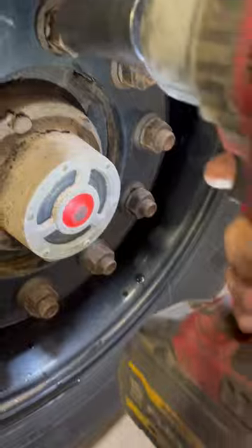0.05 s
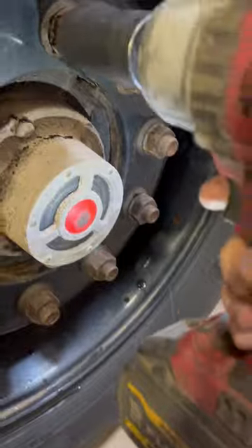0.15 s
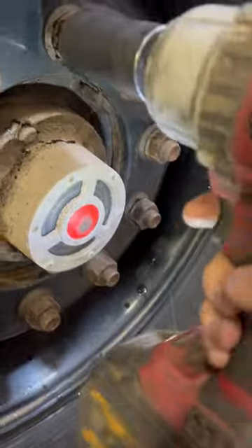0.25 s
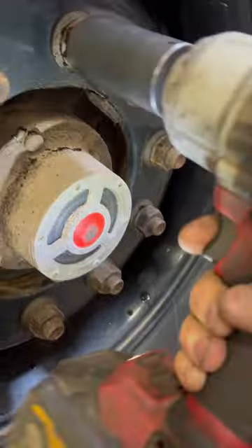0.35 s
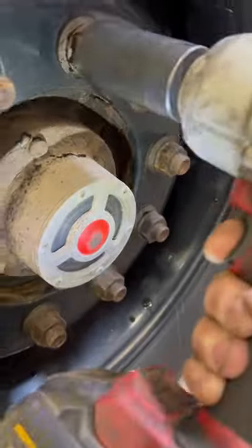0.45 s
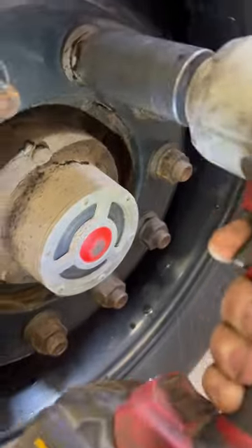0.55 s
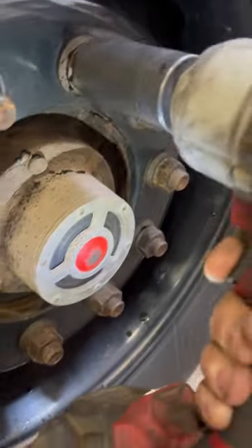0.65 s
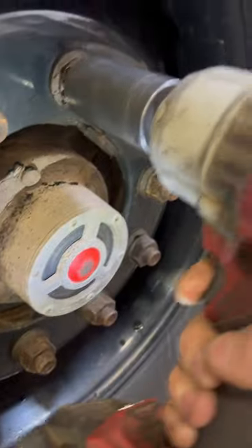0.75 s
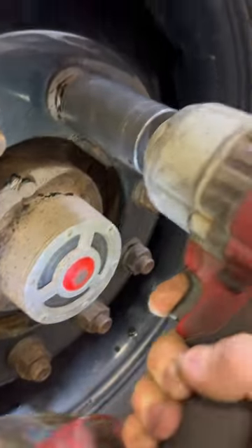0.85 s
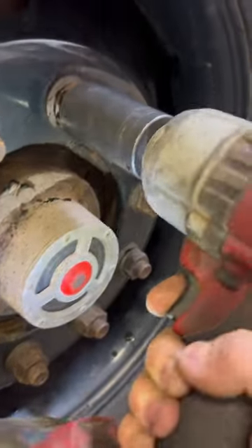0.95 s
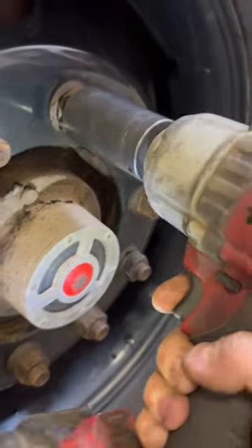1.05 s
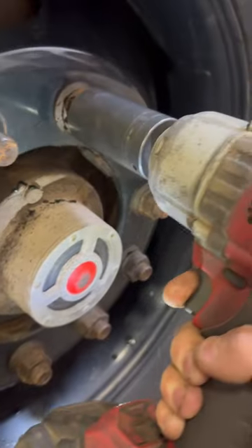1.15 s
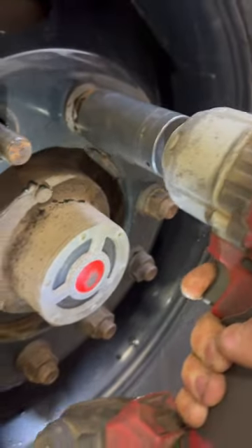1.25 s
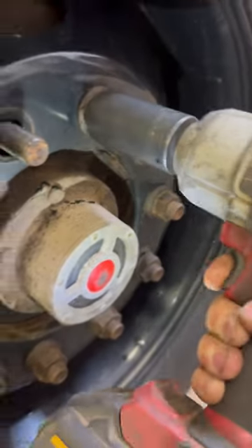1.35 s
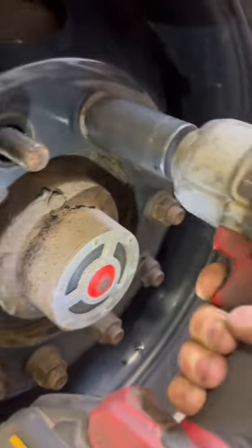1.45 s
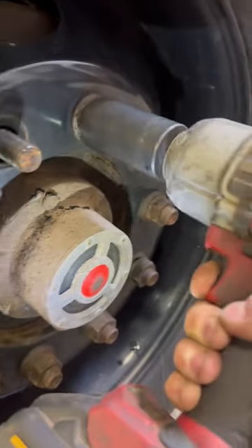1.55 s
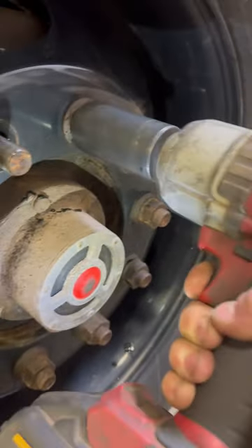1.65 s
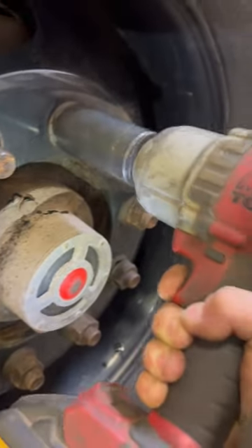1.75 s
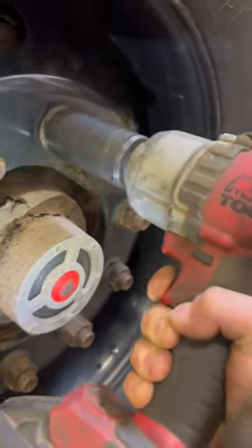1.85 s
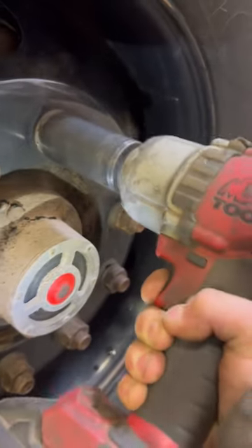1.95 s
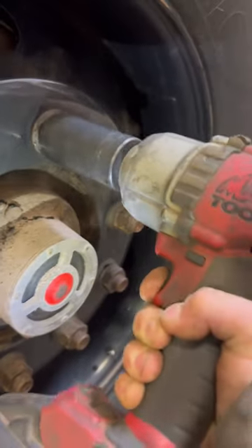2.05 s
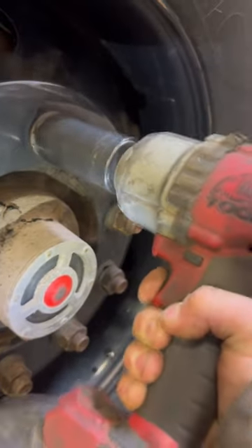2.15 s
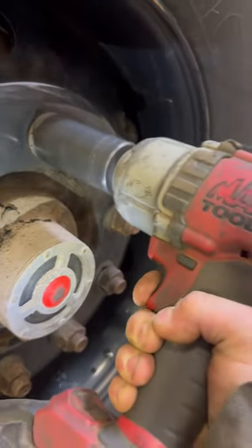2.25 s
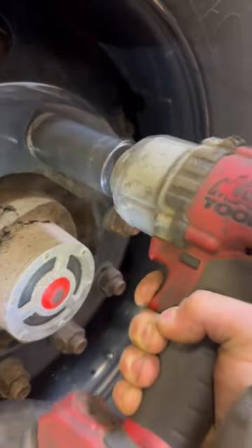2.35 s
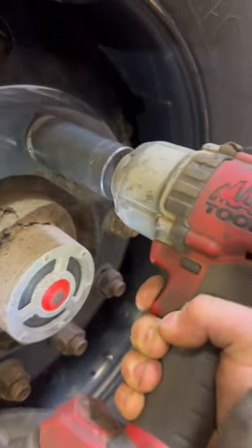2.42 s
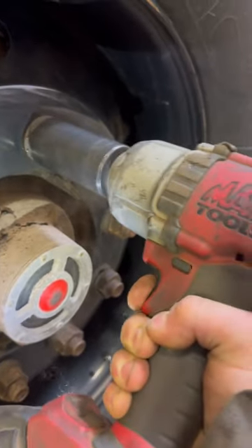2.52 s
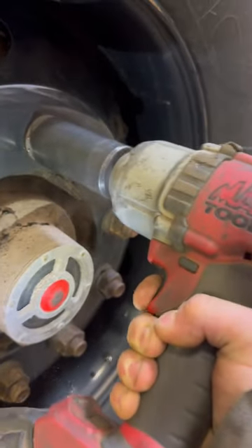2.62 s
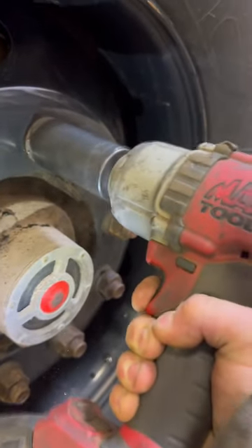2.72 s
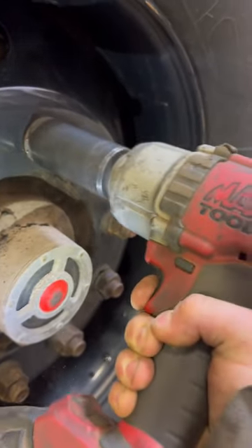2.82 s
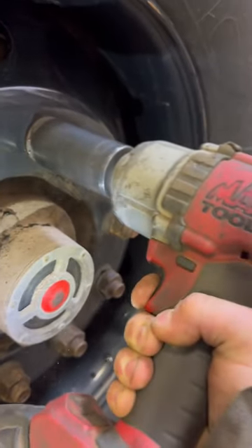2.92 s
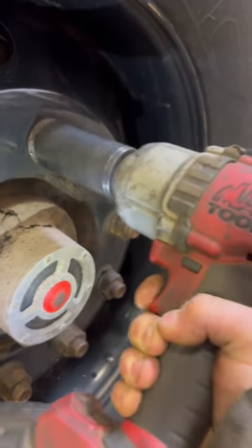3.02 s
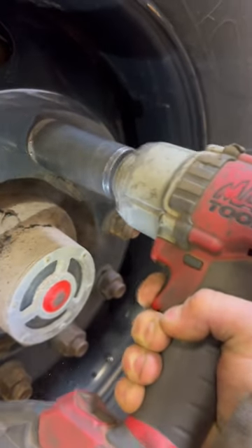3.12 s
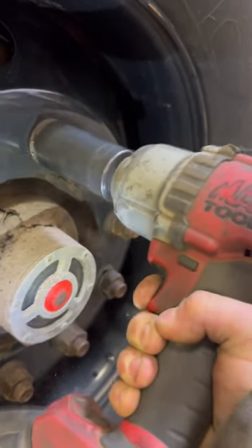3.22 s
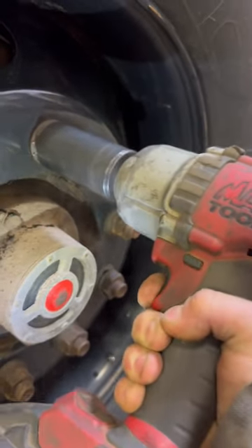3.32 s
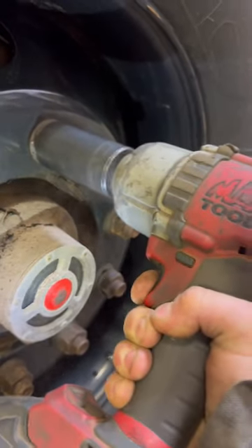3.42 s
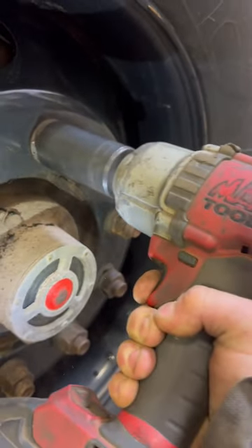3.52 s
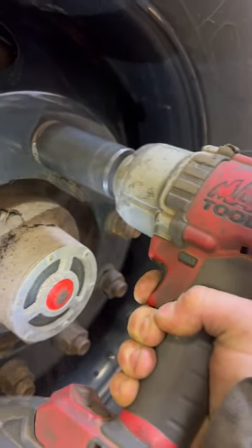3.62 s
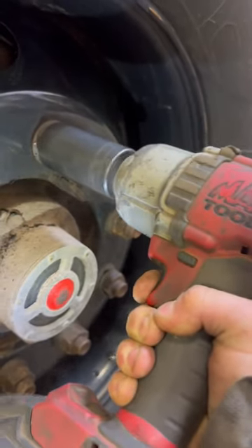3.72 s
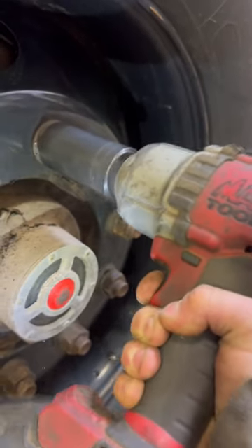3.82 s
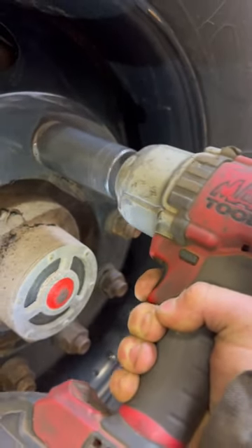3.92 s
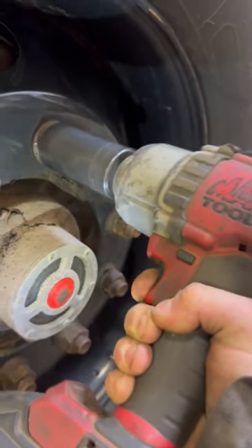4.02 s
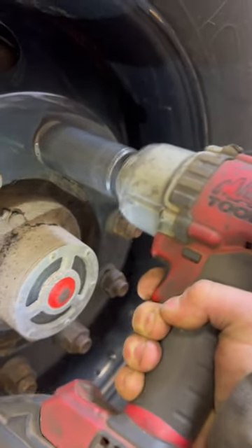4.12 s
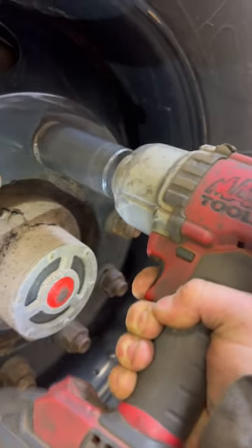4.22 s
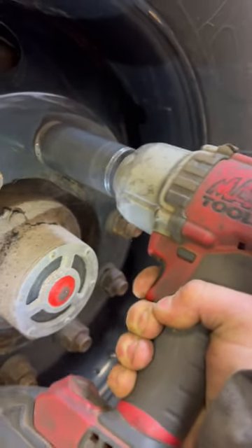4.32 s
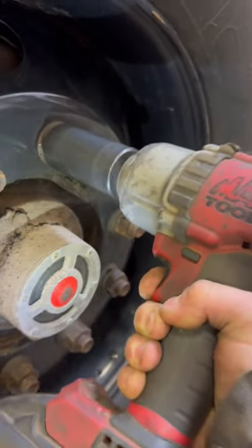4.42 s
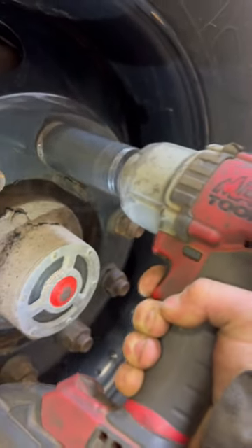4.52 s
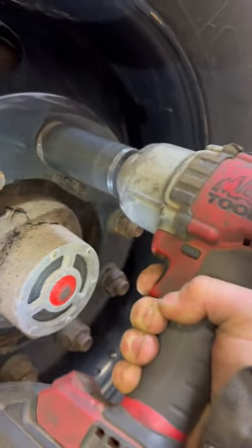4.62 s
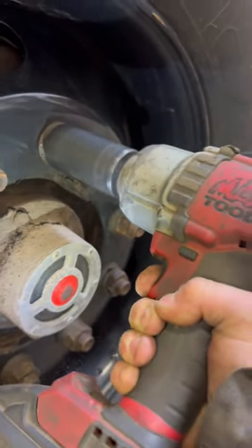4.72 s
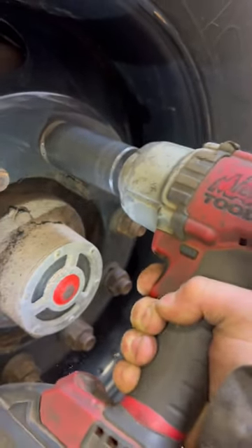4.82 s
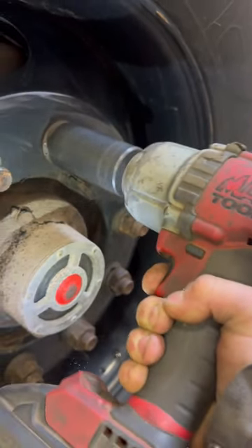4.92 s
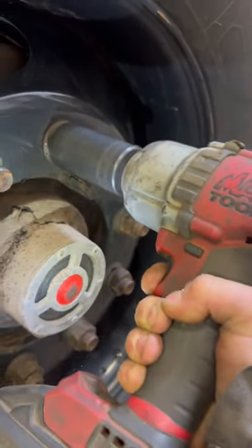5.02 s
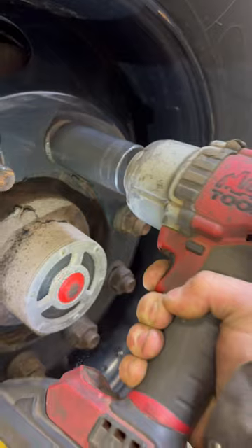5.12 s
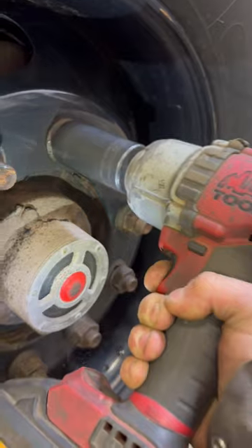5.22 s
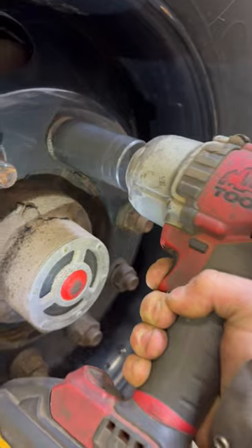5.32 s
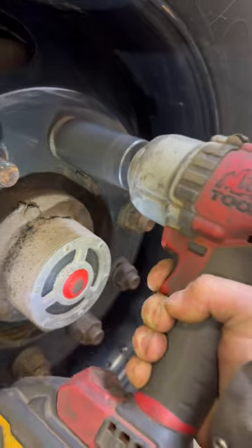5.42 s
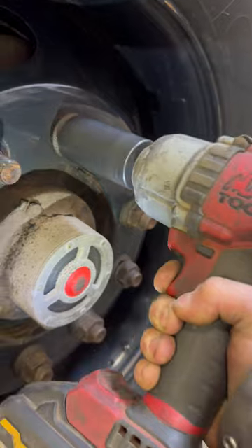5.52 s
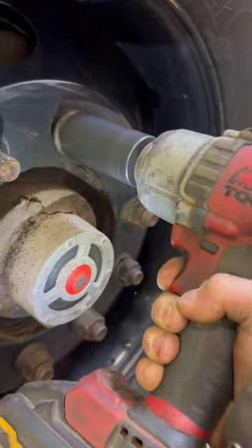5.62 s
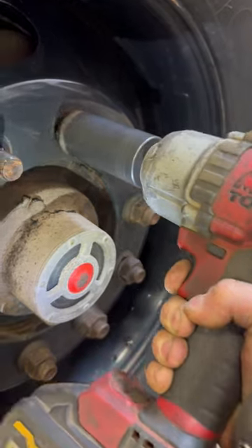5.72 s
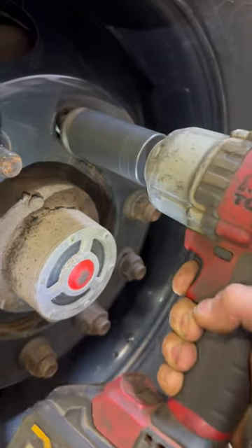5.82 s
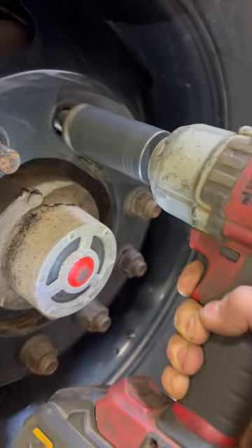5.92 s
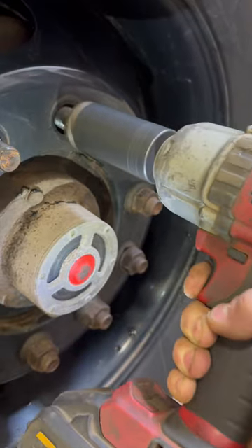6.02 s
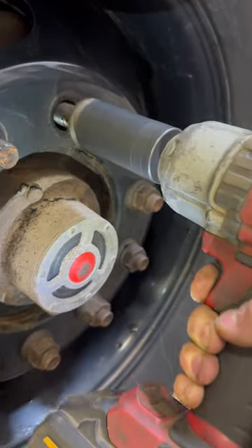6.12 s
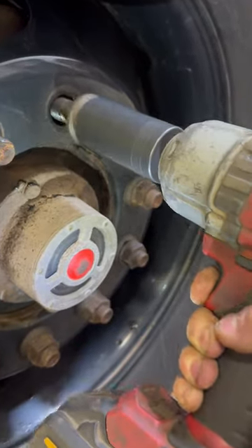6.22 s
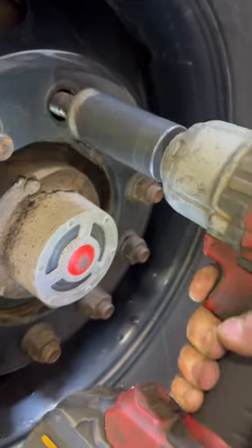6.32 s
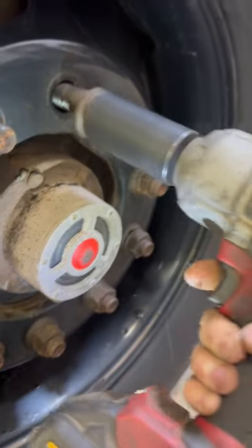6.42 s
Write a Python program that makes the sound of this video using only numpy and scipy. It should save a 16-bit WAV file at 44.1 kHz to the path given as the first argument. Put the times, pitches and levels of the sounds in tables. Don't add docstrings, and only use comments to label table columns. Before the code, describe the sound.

After a few sharp steel clicks, an impact wrench batters a wheel nut at machine-gun speed, loosens it, then whirs freely and begins slowing.

```python
import sys
import numpy as np
from scipy import signal
from scipy.fft import rfft, irfft, next_fast_len
from scipy.io import wavfile
from scipy.ndimage import uniform_filter1d

SR = 44100
rng = np.random.default_rng(int(sys.argv[2]) if len(sys.argv) > 2 else 0)


def amplitude_ratio(level_db):
    exponent = np.asarray(level_db, float) / 20
    return 10 ** exponent


def generate_wav(sig):
    pcm = np.round(np.clip(np.atleast_2d(sig).T, -1, 1) * 32767).astype(np.int16)
    wavfile.write(sys.argv[1], SR, pcm)


N = 284886

# time in seconds, blow in dB, looseness of the socket as ring re blow in dB.
EFFORT = [(1.38, -20, -12), (1.42, -6.5, -8), (1.6, 0, -19.5), (1.95, -1, -16.5), (2.4, -5, -7),
          (3.0, -7.5, -3), (3.4, -8, -3.5), (4.3, -7, -9), (4.7, -10, -3), (5.27, -9, -13.5),
          (5.55, -11.5, -14), (5.6, -26, -16)]
# frequency in Hz, level in dB, t60 in seconds.
SOCKET = [(8140, -7, .035), (8220, -6, .04), (8300, -4, .05), (8400, -6, .04), (8490, -4, .05),
          (8620, -8, .035), (8800, -12, .02)]
# frequency in Hz, level in dB, t60 in seconds.
PIN = [(2870, -10, 0.033), (3640, 7.5, 0.02), (4300, -3, 0.028), (6150, -1, .012)]


def rms_one(x):
    return x / np.sqrt(np.mean(x ** 2) + 1e-20)


def in_time(rows, quiet=None):
    s, *columns = np.transpose(rows)
    return [np.interp(np.arange(N) / SR, s, c, left=quiet, right=quiet) for c in columns]


def at_hz(points, hz):
    f, value = np.transpose(points)
    return np.interp(np.log(hz + 1), np.log(f + 1), value)


def colour(x, spectrum):
    size = 4096
    cepstrum = irfft(np.log(amplitude_ratio(at_hz(spectrum, np.arange(size // 2 + 1) * SR / size))))
    cepstrum[1:size // 2] *= 2
    cepstrum[size // 2 + 1:] = 0
    response = irfft(np.exp(rfft(cepstrum)))
    return signal.fftconvolve(x, response[None] / np.linalg.norm(response), axes=-1)[:, :N]


def butter(x, cut_hz, kind="low"):
    return signal.sosfilt(signal.butter(2, cut_hz, kind, fs=SR, output="sos"), x)


def drift(rate_hz):
    r = np.exp(-2 * np.pi * rate_hz / SR)
    return rms_one(signal.lfilter([1], [1, -2 * r, r * r], rng.standard_normal(N + SR))[SR:])


def fade(x, t60_s):
    return signal.lfilter([1], [1, -amplitude_ratio(-60 / (t60_s * SR))], x + 1e-18)


def ring(x, modes, spread_db):
    out = 0
    for hz, level_db, t60_s in modes:
        r, w = amplitude_ratio(-60 / (t60_s * SR)), 2 * np.pi * hz / SR
        caught = amplitude_ratio(level_db + spread_db * drift(43.0))
        out = out + signal.lfilter([0, np.sin(w)], [1, -2 * r * np.cos(w), r * r], x * caught + 1e-18)
    return out


def grit(rough_db):
    sizes = amplitude_ratio(rough_db * np.minimum(rng.exponential(1, (2, N)), 5))
    return rms_one(sizes * rng.standard_normal((2, N)))


def impulses(events):
    out = np.zeros((2, N))
    for s, peak_db in events:
        out[:, round(s * SR)] = amplitude_ratio(peak_db)
    return out


def garage():
    # frequency in Hz, level in dB per Hz.
    air_spectrum = [(15, -46), (25, -36), (124, -6), (651, -25.5), (3500, -35), (8100, -40.5), (11000, -66),
                    (14300, -83), (22000, -120)]
    air_db, hum_hz, hum_db = -61.5, 123, -107
    trigger_s, duck_db = 1.4, -11.5
    open_s, shut_db = 0.031, -18
    t = np.arange(N) / SR
    hum = amplitude_ratio(hum_db + 1.7 * drift(5.0)) * np.sin(2 * np.pi * hum_hz * t)
    air = amplitude_ratio(air_db) * colour(rng.standard_normal((2, N)), air_spectrum)
    return (air + hum) * amplitude_ratio(duck_db * (t > trigger_s) + shut_db * (t < open_s))


def room(x):
    t60_s = 0.21
    t = np.arange(SR // 2) / SR
    tail = rng.standard_normal((2, len(t))) * amplitude_ratio(-60 * t / t60_s) * (t > .003)
    tail = signal.lfilter([1], [1, -.4], tail)
    return signal.fftconvolve(x, tail / np.linalg.norm(tail[0]), axes=-1)[:, :N]


def sliding():
    # start in seconds, hold in seconds, level in dB.
    slides = [
        (0.047, 0.17, -63.5),
        (.3, 0.075, -61),
        (0.45, 0.033, -50),
        (0.635, 0.071, -49),
        (1.248, .08, -51),
    ]
    # frequency in Hz, level in dB per Hz.
    rubbed = [(290, -9), (500, -12), (1580, -18.5), (2210, -21), (2330, -19), (3480, -19), (4930, -25),
              (9790, -29), (11000, -49), (14300, -65), (22000, -120)]
    attack_db_per_s, release_db_per_s, rest_db = 900.0, 78, -84
    catch_s, catch_db, run_up_db_per_s = 1.4, -30.0, 300.0
    t = np.arange(N) / SR
    curves = [catch_db - run_up_db_per_s * (catch_s - t), rest_db + 0 * t]
    for s, hold_s, level_db in slides:
        swell_db = attack_db_per_s * np.maximum(s - t, 0)
        release_db = release_db_per_s * np.maximum(t - s - hold_s, 0)
        curves.append(level_db - swell_db - release_db)
    level_db = np.where(t < catch_s, np.max(curves, axis=0), -140)
    rub = amplitude_ratio(level_db + 1.1 * drift(40.0)) * colour(grit(6.4), rubbed)
    return rub + amplitude_ratio(-40.0) * ring(rub, PIN, spread_db=3)


def loose_parts():
    # time in seconds, peak in dB.
    pin_ticks = [
        (0.7851, -45),
        (0.7994, -57),
        (0.8445, -48),
        (0.8609, -48),
        (0.9143, -58),
        (0.9742, -57),
        (1.0445, -55),
    ]
    # time in seconds, peak in dB.
    nut_ticks = [
        (6.2624, -37),
        (6.344, -41),
        (6.4093, -39),
    ]
    pin = ring(impulses(pin_ticks), PIN, spread_db=1.5) / 2
    taps = uniform_filter1d(impulses(nut_ticks), size=60) * grit(1.8) * 6.2
    return pin + amplitude_ratio(-2.5) * ring(taps, SOCKET, spread_db=9.5)


def tyre():
    # frequency in Hz, level in dB, t60 in seconds.
    cavity = [(167.7, -8.5, 0.44)]
    return ring(impulses([(0.754, -30.0)]), cavity, spread_db=1) * amplitude_ratio(2.0 * drift(30.0))


def knocks():
    # time in seconds, peak in dB, wheel ring re peak in dB, crack t60 in seconds.
    contacts = [(0.041, -19, -15.5, 0.027), (0.054, -34.5, -7, 0.044), (0.122, -18.5, -12.5, 0.058),
                (0.311, -38, -4, 0.036), (0.342, -39, -23, 0.072), (0.369, -46, -9, 0.04),
                (0.447, -22.5, -31, 0.055), (0.51, -6, -28, 0.024), (0.626, -35, -32, 0.066),
                (0.648, -27, -11.5, 0.037), (0.715, -11, -14.5, 0.031), (0.723, -46.5, 12, 0.037),
                (1.286, -0.5, -11, 0.022), (5.529, -32.5, 5.5, 0.03), (6.346, -36, -31, 0.052)]
    # frequency in Hz, level in dB, t60 in seconds.
    wheel_modes = [(235, 1.5, 0.026), (304, -2, 0.03), (435.4, -2, 0.17), (465, -5, 0.096),
                   (520, -10, 0.073), (960, -15, 0.21)]
    # frequency in Hz, level in dB per Hz.
    knock_spectrum = [(180, -35), (300, -13.5), (1360, 1), (1650, -9.5), (2200, -2), (5000, -12),
                      (7600, -7.5), (11700, -26), (14000, -53)]
    crack, low, t = np.zeros(N), np.zeros(N), np.arange(6000) / SR
    for s, peak_db, ring_db, t60_s in contacts:
        i = round(s * SR)
        n = min(len(t), N - i)
        rise = 1 - np.exp(-t[:n] / 0.00056)
        crack[i:i + n] += amplitude_ratio(peak_db - 60 * t[:n] / max(t60_s, .01)) * rise
        low[i:i + n] += amplitude_ratio(peak_db + ring_db - 60 * t[:n] / 0.063)
    burst = crack * grit(3.5)
    wheel = amplitude_ratio(-26.0) * ring(low * grit(0.27), wheel_modes, spread_db=3.0)
    wheel = butter(wheel, 170.0, "high")
    return amplitude_ratio(-10.0) * colour(burst, knock_spectrum) + wheel


def motor():
    # time in seconds, shaft tone in Hz, slot whine in dB, drag of the thread in dB.
    spin = [
        (5.56, 880, -66, -8),
        (5.64, 926, -60, -4),
        (5.73, 990, -47, -2),
        (5.88, 1020, -63, 0.5),
        (5.95, 1035, -52, 0.5),
        (6.1, 1047, -39.5, -3),
        (6.18, 1043, -42, -16),
        (6.385, 1040, -45, -16),
        (6.46, 926, -62, -14),
    ]
    # multiple of the shaft tone, width in kHz, level in dB.
    gear_bands = [(1.51, .15, 2.5), (3.02, .25, 2)]
    # frequency in Hz, level in dB per Hz.
    hiss_spectrum = [(200, -14.5), (450, -8), (650, -10.5), (1000, -1.5), (2300, -2.5), (3300, 0.5),
                     (3700, -2.5), (4300, 1.5), (5000, -7), (6000, 0.5), (8400, -4), (10300, -6.5),
                     (12000, -34), (15700, -5)]
    # frequency in Hz, level in dB per Hz.
    wobble_spectrum = [(30, -25), (70, -5), (110, -21), (300, -26), (500, -38)]
    wobble_from_s, release_s, wobble_peak_db, wobble_rise_db_per_s = 5.88, 6.39, -53.0, 30.0
    bump_gap_s, last_bump_s = .061, 6.36
    throb_per_s = 33.0
    t = np.arange(N) / SR
    hz = in_time(spin)[0]
    _, whine_db, drag_db = in_time(spin, quiet=-140)
    off_db = -140 * (t < spin[0][0])
    tone_db = -60 + 0.18 * drag_db + off_db
    gear_db = -54.5 + drag_db
    hiss_db = -38 + 0.02 * drag_db + off_db

    turn = 2 * np.pi * np.cumsum(hz * (1 + 0.00128 * drift(56.0))) / SR
    tones = amplitude_ratio(tone_db + 4.5) * np.sin(turn)
    tones = tones + amplitude_ratio(whine_db + 2 + 1.5 * drift(25.0)) * np.sin(7 * turn)

    throb_hz = throb_per_s * hz / 1040 * (1 + 0.144 * drift(8.8))
    throb = np.cos(np.pi * np.cumsum(throb_hz) / SR) ** 2
    bands = 0
    for multiple, width_khz, level_db in gear_bands:
        bands = bands + amplitude_ratio(level_db) * (1.3 + drift(width_khz * 1000)) * np.sin(multiple * turn)
    gears = amplitude_ratio(gear_db) * (.6 + throb) * bands

    hiss = amplitude_ratio(hiss_db - 4.0 + 0.83 * drift(33.0)) * colour(grit(1.6), hiss_spectrum)

    wobbling = (t > wobble_from_s) & (t < release_s)
    wobble_db = np.where(wobbling, wobble_peak_db - wobble_rise_db_per_s * (release_s - t), -140)
    wobble_db += 20 * np.log10(0.33 + np.cos(np.pi * (t - last_bump_s) / bump_gap_s) ** 2)
    wobble = amplitude_ratio(wobble_db) * colour(grit(1.5), wobble_spectrum)
    return (tones + gears) * [[1], [.3]] + hiss + wobble


def steady_blows():
    # time in seconds, lateness of the blows in ms.
    late = [
        (1.56, -.6),
        (3.1, -1.5),
        (3.4, .9),
        (3.82, -.3),
        (4.26, 1.8),
        (4.34, -.8),
        (5.27, -.2),
    ]
    first_blow_s, gap_s, quicken_s, count = 1.559, .022449, 7.49e-6, 171
    jitter_ms, blow_spread_db, ring_spread_db = .4, .7, 4.5
    k = np.arange(count)
    s = first_blow_s + gap_s * k - quicken_s * k ** 2 / 2
    luck = rng.standard_normal((count, 3))
    at, blow_db, loose_db = np.transpose(EFFORT)
    late_ms = np.interp(s, *np.transpose(late)) + jitter_ms * luck[:, 0]
    swing = luck[:, 2] - 0.28 * np.roll(luck[:, 2], 1)
    peak_db = np.interp(s, at, blow_db) + blow_spread_db * luck[:, 1]
    ring_db = np.interp(s, at, loose_db) + ring_spread_db * swing
    return list(zip(s + late_ms / 1000, peak_db, ring_db))


def blow_contacts(blows):
    snap_db, snap_spread_db, snap_cut_hz = 17.0, 2.5, 4000.0
    chatter, pushes, snaps = np.zeros((3, N))
    t = np.arange(900) / SR
    luck = rng.standard_normal((len(blows), 2))
    for (s, peak_db, ring_db), (longer, harder) in zip(blows, luck):
        i = round(s * SR)
        ms = 9.5 + 0.26 * ring_db + 1.0 * longer
        held = 1 / (1 + np.exp(np.clip((t * 1000 - ms) / .5, -30, 30)))
        shape = .5 * np.exp(-t / 0.00021) + (0.5 * held + 0.24) * np.exp(-t / 0.016)
        chatter[i:i + 900] += amplitude_ratio(peak_db) * shape * (1 - np.exp(-t / 0.000096))
        snaps[i + 8] = amplitude_ratio(peak_db + snap_db + snap_spread_db * harder) * np.sign(longer)
        pushes[i] = amplitude_ratio(0.57 * harder)
    return chatter, butter(snaps, snap_cut_hz) * [[1], [.3]], pushes


def uneven(x):
    out = 0
    for cut_hz in (700.0, 1400.0, 2500.0, 4500.0, 7000.0):
        low = butter(x, cut_hz)
        out = out + low * amplitude_ratio(1.5 * drift(35.0))
        x = x - low
    return out + x * amplitude_ratio(.8 * drift(35.0))


def dispersed(x):
    bend_cycles, bend_hz = 2.1, 200.0
    size = next_fast_len(N + 4096)
    hz = np.arange(size // 2 + 1) * SR / size
    lag = 2 * np.pi * bend_cycles * np.log(1 + hz / bend_hz)
    return irfft(rfft(x, size) * np.exp(-1j * lag), size)[:, :N]


def socket_ring(blows):
    s, peak_db, ring_db = np.transpose(blows)
    out = 0
    for mode in SOCKET:
        luck = rng.random((len(s), 4))
        clicks = np.zeros((2, N))
        for row in (0, 1):
            at = np.round((s + .0008 + 0.0033 * luck[:, row]) * SR).astype(int)
            clicks[row, at] = amplitude_ratio(peak_db + .7 * ring_db) * np.sign(luck[:, 2 + row] - .5)
        out = out + ring(clicks, [mode], spread_db=1.2)
    return butter(out, [7600.0, 9400.0], "band")


def wheel_thud(pushes, effort_db):
    # frequency in Hz, level in dB per Hz.
    thud_spectrum = [(15, -20), (25, -16), (80, 2.5), (371, -4.5), (448, 1), (549, -8.5), (800, -12),
                     (1040, -22), (1760, -120)]
    rock_from_s, rock_to_s, rock_edge_s, rock_db = 1.42, 1.926, 0.038, 9.5
    nut_gives_s, unload_db_per_s = 5.1, 18
    t = np.arange(N) / SR
    rocking = (np.tanh((t - rock_from_s) / rock_edge_s) - np.tanh((t - rock_to_s) / rock_edge_s)) / 2
    thud_db = effort_db - 21 + rock_db * rocking - unload_db_per_s * np.maximum(t - nut_gives_s, 0)
    shaken = (0.092 + fade(pushes, 0.056)) * grit(0.7)
    return amplitude_ratio(thud_db) * 0.5 * colour(shaken, thud_spectrum)


def hammer():
    # time in seconds, peak in dB, socket ring re peak in dB.
    stray_blows = [(1.3998, -9, -30), (1.4086, 0, -37), (1.4219, -6, -38), (1.4473, 6, -32.5),
                   (1.4706, -7, -38), (1.4834, 1, -22), (1.5082, -1, -26), (1.5352, 0, -9),
                   (5.291, -9.5, -7), (5.3174, -11, 1), (5.3449, -13.5, -9), (5.3586, -18, -17),
                   (5.375, -12, -31), (5.3894, -6.5, -29), (5.4092, -13, -5), (5.4247, -11, -27),
                   (5.4412, -6, -20), (5.4709, -11, -10), (5.49, -7.5, -35), (5.507, -13.5, -12),
                   (5.522, -8.5, -25), (5.541, -10, -7), (5.5644, -12, -30.5)]
    # frequency in Hz, level in dB per Hz.
    crack_spectrum = [(180, -18.5), (300, -17), (737, -17.5), (1100, -13.5), (1410, -13.5), (3400, -10.5),
                      (4910, -13.5), (5700, -8), (7570, -8.5), (8360, -8.5), (10200, -15), (11500, -32),
                      (13300, -28), (15200, -24), (15750, -14), (16100, -45)]
    # frequency in Hz, level in dB, t60 in seconds.
    anvil_modes = [(5250, -32, 0.029), (6870, -10.5, 0.023)]
    blows = steady_blows() + list(stray_blows)
    chatter, snap, pushes = blow_contacts(blows)
    effort_db = in_time(EFFORT, quiet=-140)[0]
    clatter_db = effort_db - 19
    crack = amplitude_ratio(-7.0) * colour(chatter * grit(4.1) + snap, crack_spectrum)
    clatter = amplitude_ratio(clatter_db - 3.5) * colour(grit(3.36), crack_spectrum)
    socket = amplitude_ratio(-3.5) * socket_ring(blows)
    socket = socket + amplitude_ratio(clatter_db - 36.0) * ring(grit(2.0), SOCKET, spread_db=1.5)
    anvil = amplitude_ratio(-34.0) * ring(chatter * grit(0.88), anvil_modes, spread_db=7.5)
    return uneven(dispersed(crack)) + clatter + socket + anvil + wheel_thud(pushes, effort_db)


def ports(direct, scattered):
    # frequency in Hz, difference minus sum in dB.
    port_side = [(60, -23), (150, -17), (500, -4.5), (1150, -4.5), (1750, -23), (2800, -4), (3900, -9),
                 (4900, -1.5), (6300, -16), (8400, -2.5), (10000, 2.5), (11700, 13), (15700, 6)]
    # frequency in Hz, lead of the left port in rad.
    port_lead = [(900, -0.27), (1300, 0.26), (4500, -0.37), (5100, .6), (7400, -0.74)]
    # frequency in Hz, left minus right in dB.
    left_boost = [(170, 0), (300, 4), (450, 0.5)]
    share = 0.19
    size = next_fast_len(N + 4096)
    hz = np.arange(size // 2 + 1) * SR / size
    lead = np.tanh(4 * at_hz(port_lead, hz))
    middle = rfft(direct, size)
    side = 1j * lead * np.sqrt(1 - share) * middle
    side += np.sqrt(1 - (1 - share) * lead ** 2) * rfft(scattered, size)
    side = side * amplitude_ratio(at_hz(port_side, hz))
    side += np.tanh(at_hz(left_boost, hz) * np.log(10) / 40) * middle
    side = irfft(side, size)[:N]
    return np.array([direct + side, direct - side])


def scene():
    room_db = -19
    tool = motor() + sliding() + loose_parts() + tyre() + knocks() + hammer()
    return ports(*(tool + amplitude_ratio(room_db) * room(tool) + garage()))


def band_limit(x):
    return signal.sosfilt(signal.butter(12, 17150, fs=SR, output="sos"), x)


def record(dry):
    rounded = 0.97 * np.tanh(dry / 1.23)
    low_pass = signal.cheby2(10, 40, 16400, fs=SR, output="sos")
    return band_limit(signal.sosfiltfilt(low_pass, rounded))


dry = scene()
out = record(dry)
generate_wav(out)
```